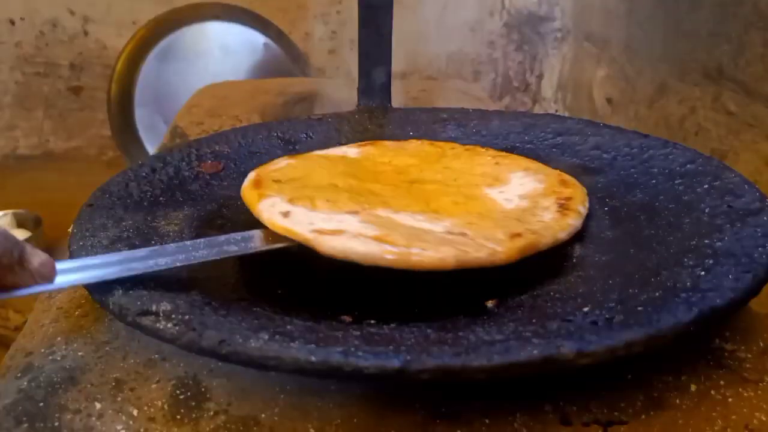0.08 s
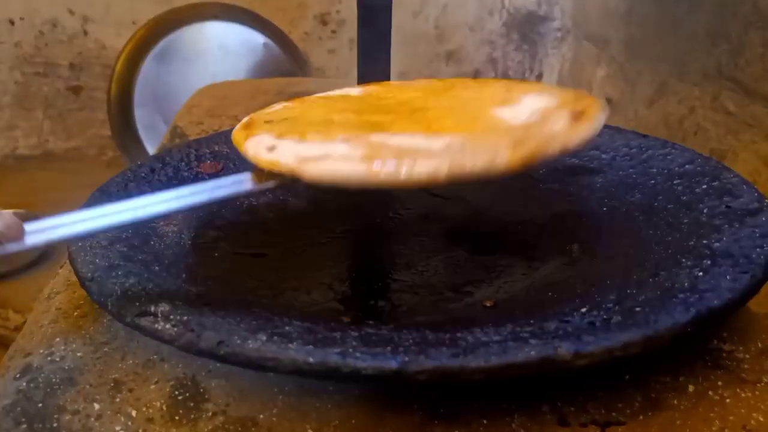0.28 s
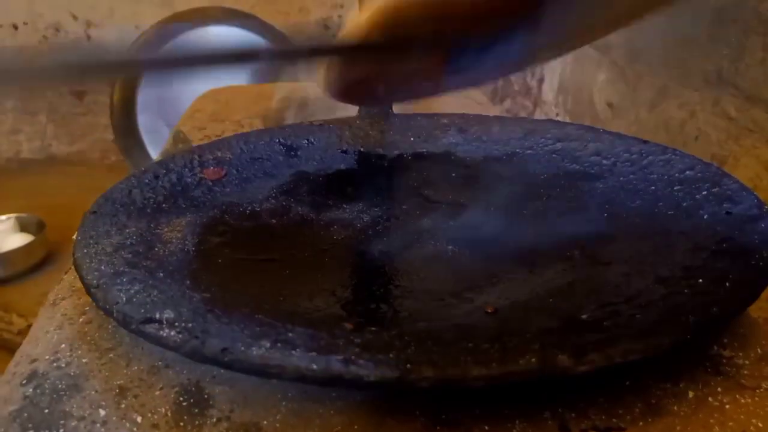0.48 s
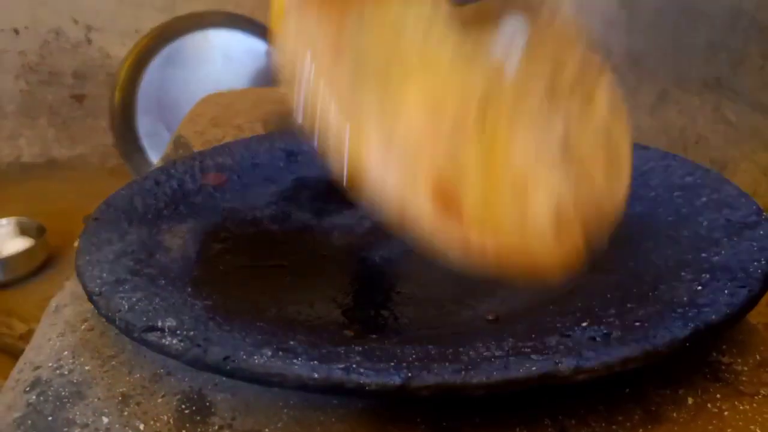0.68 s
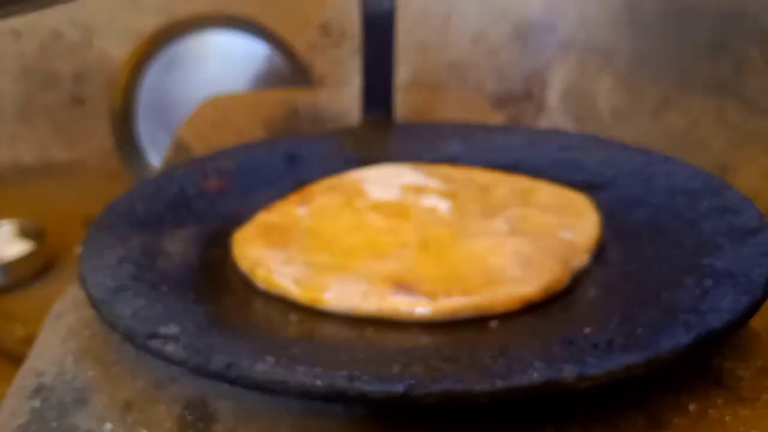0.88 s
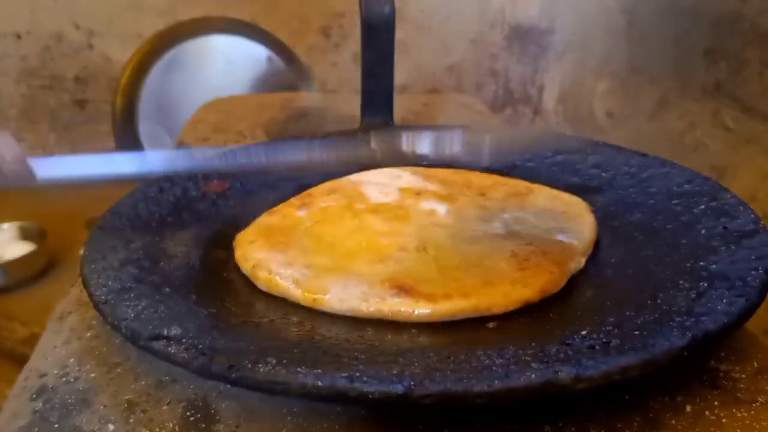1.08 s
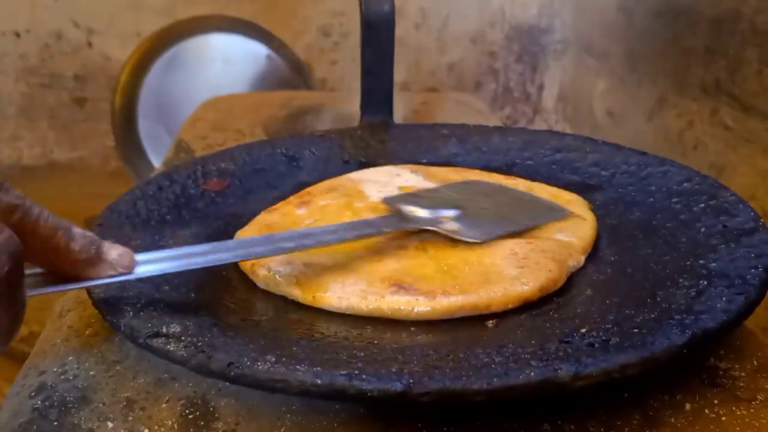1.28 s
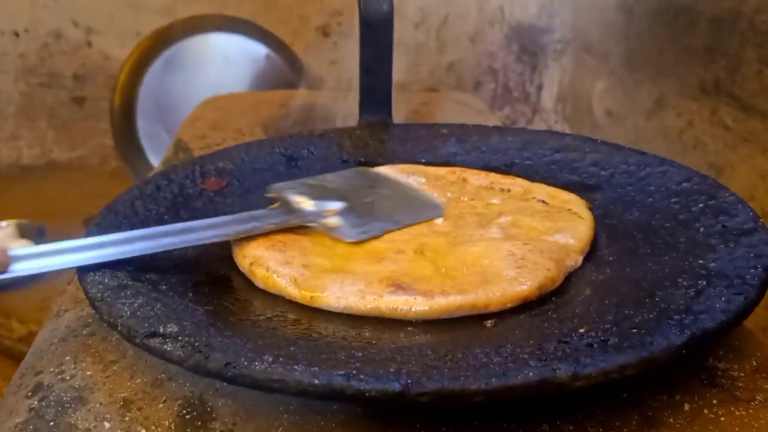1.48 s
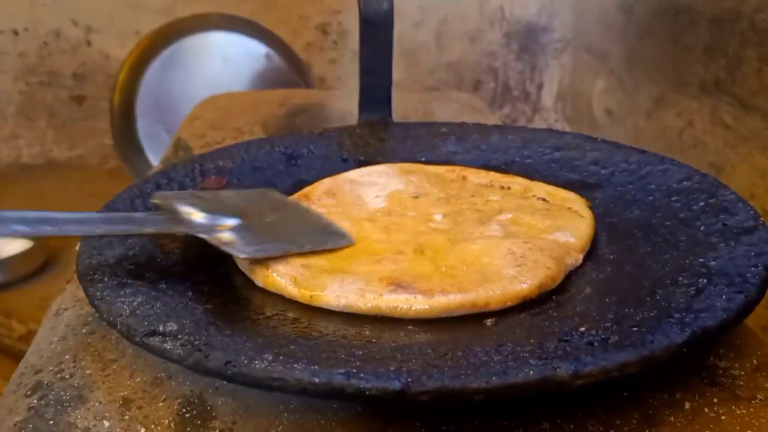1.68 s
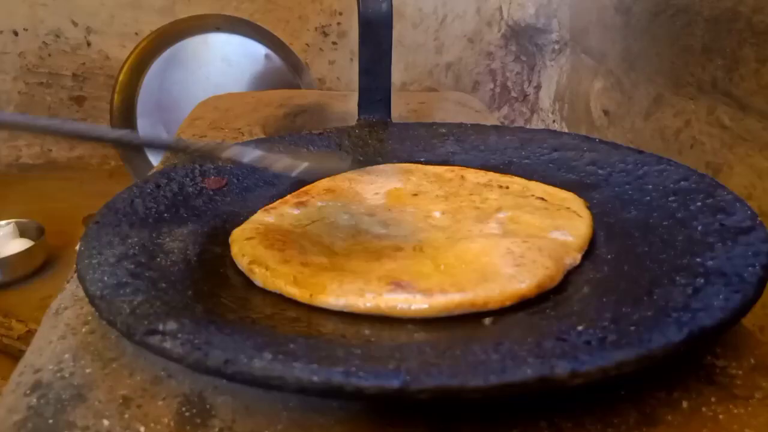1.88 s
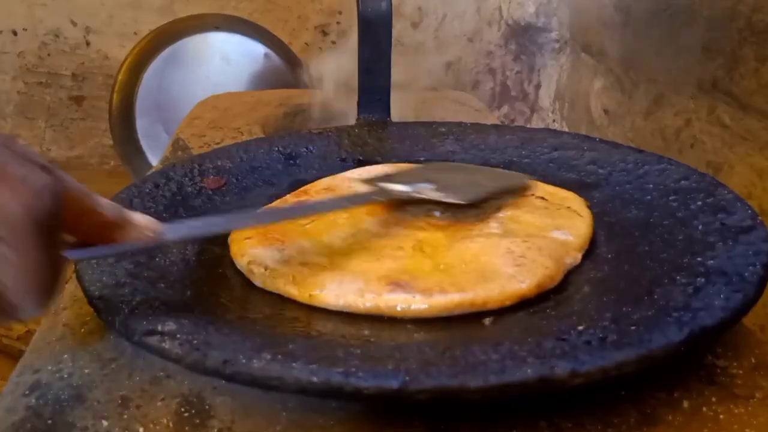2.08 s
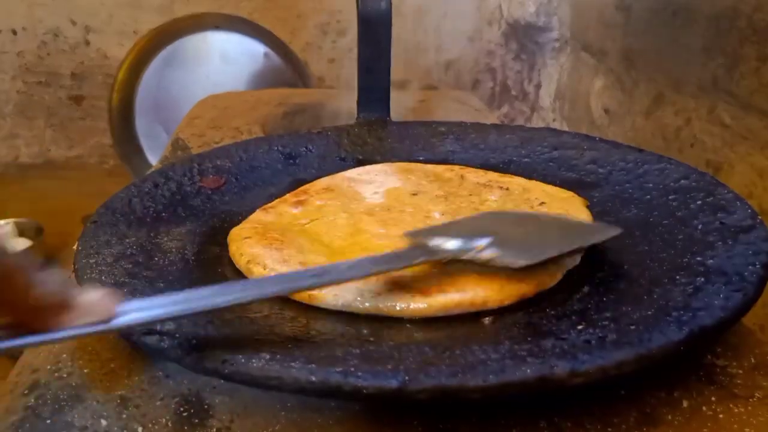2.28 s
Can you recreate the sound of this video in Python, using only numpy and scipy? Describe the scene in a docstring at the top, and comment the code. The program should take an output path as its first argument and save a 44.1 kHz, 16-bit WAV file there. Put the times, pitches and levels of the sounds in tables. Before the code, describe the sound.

Oily sizzle of bread frying on a griddle, a sharp metal spatula clack, then pressed steam hissing

```python
"""Oil sizzles on an iron griddle: bubble-modulated noise, with brief whistling notes of resonant noise.
A steel spatula flips a flatbread with one loud double knock, a crack together with decaying tones.
The sizzle thins while the bread is off the iron and flares when it lies down again.
The blade then rubs the bread (stick-slip noise) amid soft low swells, squeezing out more steam.
Single droplets spit as short bright ticks; all is close and mono, the same in both channels."""
import sys
import numpy as np
from scipy import signal
from scipy.fft import rfft, irfft
from scipy.io import wavfile
from scipy.ndimage import uniform_filter1d

SR = 44100
rng = np.random.default_rng(int(sys.argv[2]) if len(sys.argv) > 2 else 0)


def file_out(sig):
    """Save sig as 16-bit WAV at sys.argv[1]."""
    # one column per channel
    cols = np.atleast_2d(sig).T
    # limit, then scale
    lim = np.clip(cols, -1, 1)
    pcm = np.round(lim * 32767).astype(np.int16)
    wavfile.write(sys.argv[1], SR, pcm)


N = 103635
TIME = np.arange(N) / SR

# Faint low room tone: (frequency [Hz], level [dB])
ROOM_SPECTRUM = [(150, 2), (400, -13), (15000, -26)]
ROOM_DB = -76.5

# Resonances of the pan and blade: (frequency [Hz], width [Hz], boost [dB])
PAN_RESONANCES = [(2562, 270, 13.5), (3582, 190, 7.5), (6000, 217, 5.5), (7325, 400, 4.5)]
# Oil simmering on the open iron: (time [s], level [dB])
SIMMER_LEVEL = [(.15, -39.5), (.36, -41), (.66, -47), (.9, -43.5), (1.3, -44), (1.39, -45.5), (1.52, -45.5),
                (1.9, -45), (2.35, -43.5)]
# Spectrum of the simmer: (frequency [Hz], level [dB])
SIMMER_SPECTRUM = [(2600, -38.5), (3400, -22), (4400, -12.5), (5600, -5.5), (7500, -3), (9800, -2),
                   (11200, -7), (15500, -4.5)]
# Steam flares as the bread moves, lands or is pressed:
# (start [s], rise [s], hold [s], main level [dB], treble level [dB], lower body level [dB])
STEAM_FLARES = [(-.02, 0.0044, 0.17, -36.5, -41.5, -46.5), (0.691, 0.011, 0.021, -52, -57.5, -58),
                (0.76, 0.062, 0.01, -32.5, -37, -47.5), (0.84, 0.12, 0.12, -39.5, -42, -52),
                (1.038, 0.099, 0.011, -38.5, -40.5, -47.5), (1.195, 0.045, 0.01, -40.5, -40.5, -49.5),
                (1.53, 0.0079, 0.07, -40, -43.5, -57.5), (1.623, 0.018, 0.075, -37.5, -40.5, -48),
                (1.733, 0.044, 0.054, -37, -38.5, -48), (1.845, 0.052, 0.053, -36.5, -37, -48),
                (1.961, 0.055, 0.1, -35, -37, -45.5)]
# Spectra of the flares' main part, treble and lower body: (frequency [Hz], level [dB])
FLARE_SPECTRUM = [(3000, -42.5), (4200, -15.5), (5000, -7.5), (7400, -2.5), (9700, -4), (11000, -18),
                  (14000, -38)]
TREBLE_SPECTRUM = [(8000, -31), (10200, -3), (15500, -3)]
BODY_SPECTRUM = [(1100, -45.5), (1550, -23), (2300, -22), (3000, -8.5), (4500, 0), (5500, -16.5)]
FLARE_FADE_S, FLARE_SAG_S = 0.057, 0.39
BUBBLES_PER_S, BUBBLE_SPREAD_DB, BUBBLE_S = 2000, 2.5, .0005
STEAM_SHARE = .62  # part of the boiling power that is steady steam
FLUTTER_DB, FLUTTER_HZ, HISS_PATCH_DB = .7, 74, 1.6
# Gliding resonance of the steam gap under the bread: (time [s], frequency [Hz])
GAP_RESONANCE = [(.95, 2050), (1.2, 1462), (1.56, 2850), (1.69, 2150), (1.78, 2084), (1.89, 1596)]
# Modes of that gap: (multiple of its resonance [ratio], level re the flares' lower body [dB])
GAP_MODE_SERIES = [(1, -15.5), (1.45, -15)]
GAP_WIDTH_HZ = 230

# Whistling notes within the sizzle: (middle [s], length [s], frequency [Hz], level [dB])
WHISTLING_NOTES = [(.06, 0.245, 4284, -45.5), (.56, 0.37, 3810, -61), (.815, 0.057, 5770, -40.5),
                   (2.059, 0.04, 4010, -42.5), (2.145, .07, 12400, -42.5)]
SQUEAL_WIDTH_HZ = 210

# Strokes of the blade over bread and iron: (start [s], length [s], level [dB])
RUB_STROKES = [(0.042, 0.064, -60), (1.992, 0.115, -46.5), (2.072, 0.124, -49)]
# Spectrum of the rubbing blade: (frequency [Hz], level [dB])
RUB_SPECTRUM = [(100, -48), (250, -6.5), (450, -8.5), (640, 3), (800, -5), (960, 2.5), (1170, -39),
                (1550, 1.5), (2000, -9.5), (3000, -6), (5000, -82)]
RUB_EDGE_S, SLIPS_PER_S, SLIP_SPREAD_DB, SLIP_S, RUB_PATCH_DB = .03, 800, 2, .00072, 2.3

# Soft low swells, one leading into the knock: (middle [s], length [s], frequency [Hz], level [dB])
SOFT_SWELLS = [(.213, 0.054, 235, -44.5), (.835, 0.058, 677, -62.5), (.95, 0.08, 135, -65),
               (1.155, .065, 246.5, -62.5), (1.26, 0.066, 989, -65), (1.275, 0.081, 255, -60),
               (1.29, 0.16, 1675, -65), (1.685, 0.092, 675, -59)]
SOFT_SWELL_WIDTH_HZ = 130

# Spatula knocks: (time [s], crack level [dB], ring level [dB], ring brightness [dB per octave])
SPATULA_KNOCKS = [(0.2317, -8, -15.5, 1), (0.249, -16, -30.5, 3.5)]
# Decaying tones of the knock: (frequency [Hz], relative level [dB], 60 dB decay time [s])
KNOCK_TONES = [(145, -7, .17), (212, -1.5, .15), (254, 0, .16), (376, -13, .1), (463, -29, .24),
               (560, -12, .08), (624, -26, .24), (675, -12, .08), (830, -10, .07), (960, -6, .07),
               (1678, -26, .41), (2240, -29, .25), (2492, -30, .29), (2700, -18, .11), (3432, -20, .14)]
# Spectrum of the crack: (frequency [Hz], level [dB])
CRACK_SPECTRUM = [(30, -26), (120, -5), (250, 12), (900, 0.5), (1900, -8), (4500, -6.5), (7000, -0.5),
                  (15500, -14.5)]
CRACK_S, CRACK_TAIL_S, CRACK_TAIL_DB, KNOCK_LOW_CUT_HZ = .0008, .021, -14, 110

# Spitting droplets, levels before colouring: (time [s], level [dB])
DROPLETS = [(.3655, -25), (.4857, -29), (.6985, -26.5), (1.2885, -28), (1.4353, -33), (1.5325, -27),
            (1.576, -24), (1.7724, -17), (1.7821, -21), (1.7922, -19), (1.8656, -25)]
# Spectrum of a droplet: (frequency [Hz], level [dB])
DROPLET_SPECTRUM = [(2000, -55), (3500, -26), (5200, -7), (7500, 0), (11000, -4), (15500, -7)]
SPIT_S, SPIT_TAIL_S, SPIT_TAIL_DB = .00017, .005, -14

CUTOFF_HZ = 15650


def amp(db):
    """Logarithmic level: decibels become an amplitude gain."""
    return 10 ** (np.asarray(db) / 20)


def unit(x):
    """Normalization: the signal is scaled to rms 1."""
    return x / np.sqrt(np.mean(x ** 2) + 1e-20)


def add(mix, s, sound):
    """Superposition: a sound is added to the mix from time s."""
    part = mix[max(round(s * SR), 0):][:len(sound)]
    part += sound[:len(part)]


def colour(x, points, peaks=(), size=4096):
    """Minimum-phase filtering: a folded cepstrum turns a spectrum into a causal, unit-energy response."""
    hz = np.fft.rfftfreq(size, 1 / SR)
    f, db = np.transpose(points)
    response_db = np.interp(np.log(hz + 1), np.log(f), db)
    for mid, width, boost in peaks:
        response_db = response_db + boost / (1 + (2 * (hz - mid) / width) ** 2)
    cepstrum = irfft(np.log(amp(response_db)))
    # Fold negative time onto positive time
    cepstrum[1:size // 2] *= 2
    cepstrum[size // 2 + 1:] = 0
    taps = irfft(np.exp(rfft(cepstrum)))
    return signal.oaconvolve(x, taps / np.linalg.norm(taps))[:len(x)]


def drift(rate_hz):
    """Band-limited fluctuation: low-passed noise of rms 1."""
    hz = np.fft.rfftfreq(N, 1 / SR)
    spectrum = rfft(rng.standard_normal(N)) / (1 + (hz / rate_hz) ** 4)
    return unit(irfft(spectrum, N))


def grains(per_s, spread_db, decay_s):
    """Shot process: the powers of random, exponentially decaying bursts add up to an envelope."""
    happens = rng.random(N) < per_s / SR
    size = amp(spread_db * np.minimum(rng.exponential(1, N), 6)) * happens
    power = signal.lfilter([1], [1, -np.exp(-2 / (decay_s * SR))], size ** 2)
    return unit(np.sqrt(power))


def burst(decay_s, tail_s, tail_db):
    """Impulsive excitation: a sharp puff of noise is followed by its short reverberation."""
    t = TIME[:SR // 3]
    u = t / decay_s
    puff = u * np.exp(1 - u)
    tail = amp(tail_db) * (1 - np.exp(-u)) * np.exp(-t / tail_s)
    return rng.choice([-1, 1], len(t)) * (puff + tail)


def whistle(hz, width_hz):
    """Narrow-band noise: a random complex envelope spreads a fixed or gliding carrier."""
    waver = drift(width_hz / 2) + 1j * drift(width_hz / 2)
    phase = 2 * np.pi * np.cumsum(hz * np.ones(N)) / SR
    return unit((waver * np.exp(1j * phase)).real)


def swells(rows, width_hz):
    """Transient resonance: narrow-band noise swells and fades under a cosine arch."""
    out = np.zeros(N)
    for middle, length, hz, db in rows:
        arch = np.cos(np.pi * np.clip((TIME - middle) / length, -.5, .5))
        tone = arch * whistle(hz, width_hz)
        out += amp(db) * tone * np.linalg.norm(arch) / np.linalg.norm(tone)
    return out


def patchy(x, depth_db):
    """Time-frequency modulation: random bands brighten and dim for moments."""
    z = signal.stft(x, nperseg=512, noverlap=384)[2]
    field = uniform_filter1d(rng.standard_normal(z.shape), size=6, axis=0)
    field = uniform_filter1d(field, size=14, axis=1)
    return signal.istft(z * amp(depth_db * unit(field)), nperseg=512, noverlap=384)[1][:N]


def room_tone():
    """Stationary noise: a faint low background has a fixed spectrum."""
    return amp(ROOM_DB) * unit(colour(rng.standard_normal(N), ROOM_SPECTRUM))


def flare(start, rise, hold):
    """Pressure release: steam escapes quickly, sags while pressure is held, then dies away."""
    age = np.maximum(TIME - start, 0)
    sag = age / FLARE_SAG_S
    fade = np.maximum(age - rise - hold, 0) / FLARE_FADE_S
    return np.minimum(age / rise, 1) * np.exp(-sag - fade)


def flare_levels():
    """Incoherent addition: overlapping flares add in power for main part, treble and lower body."""
    power = sum((amp(db)[:, None] * flare(start, rise, hold)) ** 2
                for start, rise, hold, *db in STEAM_FLARES)
    return np.sqrt(power)


def boiling():
    """Bubble collapse: thousands of bursts over steady steam form one fluttering envelope."""
    bubbles = grains(BUBBLES_PER_S, BUBBLE_SPREAD_DB, BUBBLE_S)
    power = STEAM_SHARE + (1 - STEAM_SHARE) * bubbles ** 2
    return np.sqrt(power) * amp(FLUTTER_DB * drift(FLUTTER_HZ))


def steam_gap():
    """Cavity resonance: noise rings in the gliding modes of the gap under the bread."""
    gap_hz = np.interp(TIME, *np.transpose(GAP_RESONANCE))
    return sum(amp(db) * whistle(ratio * gap_hz, GAP_WIDTH_HZ) for ratio, db in GAP_MODE_SERIES)


def sizzle():
    """Modulated turbulence: boiling noise sounds as a simmer and as flares that sound the steam gap."""
    boil = boiling()
    simmer = amp(np.interp(TIME, *np.transpose(SIMMER_LEVEL)))
    flares = flare_levels()
    levels = [simmer, *flares]
    spectra = [SIMMER_SPECTRUM, FLARE_SPECTRUM, TREBLE_SPECTRUM, BODY_SPECTRUM]
    hiss = np.zeros(N)
    for level, spectrum in zip(levels, spectra):
        noise = boil * rng.standard_normal(N)
        hiss += level * unit(colour(noise, spectrum, PAN_RESONANCES))
    return patchy(hiss, HISS_PATCH_DB) + flares[-1] * steam_gap()


def squeals():
    """Narrow resonance: brief whistling notes swell and fade within the sizzle."""
    return swells(WHISTLING_NOTES, SQUEAL_WIDTH_HZ)


def rubs():
    """Stick-slip friction: the blade excites low resonances unevenly as the contact shifts."""
    force = np.zeros(N)
    for start, length, db in RUB_STROKES:
        edges = np.minimum(TIME - start, start + length - TIME) / RUB_EDGE_S
        force += amp(db) * np.clip(edges, 0, 1)
    slips = force * grains(SLIPS_PER_S, SLIP_SPREAD_DB, SLIP_S) * rng.standard_normal(N)
    return colour(patchy(slips, RUB_PATCH_DB), RUB_SPECTRUM)


def soft_swells():
    """Soft resonances: each swell sounds one low or middle note."""
    return swells(SOFT_SWELLS, SOFT_SWELL_WIDTH_HZ)


def knocks():
    """Impact: a crack and decaying tones start together, with little deep bass."""
    crack, rings, t = np.zeros(N), np.zeros(N), TIME[:SR // 2]
    hz, db, t60 = np.transpose(KNOCK_TONES)[:, :, None]
    tones = -amp(db - 60 * t / t60) * np.sin(2 * np.pi * hz * t)
    octaves = np.log2(hz / hz[0])  # above the lowest tone
    snap = burst(CRACK_S, CRACK_TAIL_S, CRACK_TAIL_DB)
    for s, crack_db, ring_db, bright_db in SPATULA_KNOCKS:
        add(crack, s, amp(crack_db) * snap)
        add(rings, s, (amp(ring_db + bright_db * octaves) * tones).sum(0))
    # Only the two highest pan resonances colour the crack
    coloured_crack = colour(crack, CRACK_SPECTRUM, PAN_RESONANCES[-2:])
    low_cut = signal.butter(2, KNOCK_LOW_CUT_HZ, "highpass", fs=SR, output="sos")
    return signal.sosfilt(low_cut, coloured_crack + rings)


def spits():
    """Impulsive vaporization: single droplets burst with a bright tick."""
    ticks = np.zeros(N)
    for s, db in DROPLETS:
        add(ticks, s, amp(db) * burst(SPIT_S, SPIT_TAIL_S, SPIT_TAIL_DB))
    return colour(ticks, DROPLET_SPECTRUM, PAN_RESONANCES)


def scene():
    """Linear superposition: all sources sum to one signal, the same in both channels."""
    mono = room_tone() + sizzle() + squeals() + rubs() + soft_swells() + knocks() + spits()
    return np.array([mono, mono])


def record(dry):
    """Band limitation: the recorder's linear-phase low-pass removes the highest treble."""
    low_pass = signal.firwin(511, CUTOFF_HZ, window=("kaiser", 9), fs=SR)
    return signal.oaconvolve(dry, low_pass[None], "same")


dry = scene()
out = record(dry)
file_out(out)
```